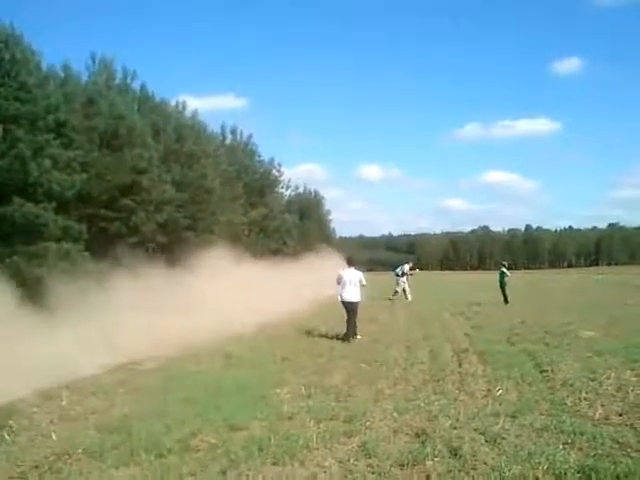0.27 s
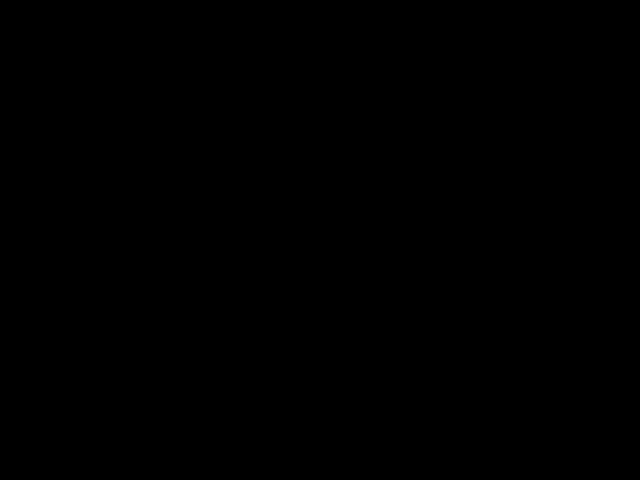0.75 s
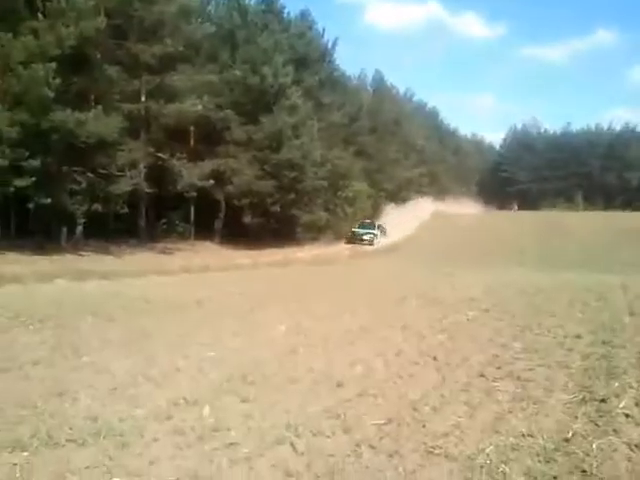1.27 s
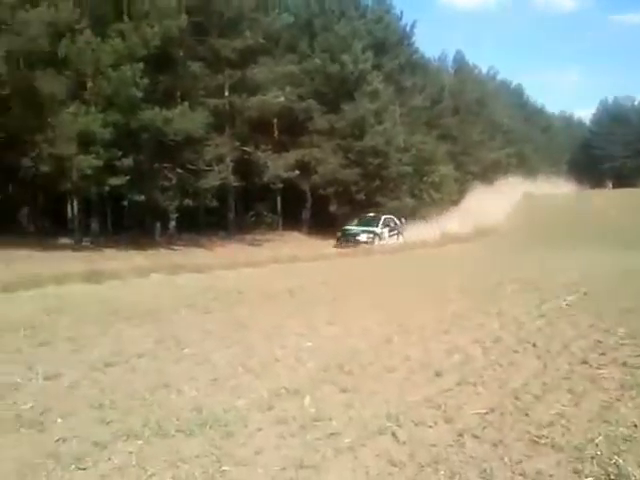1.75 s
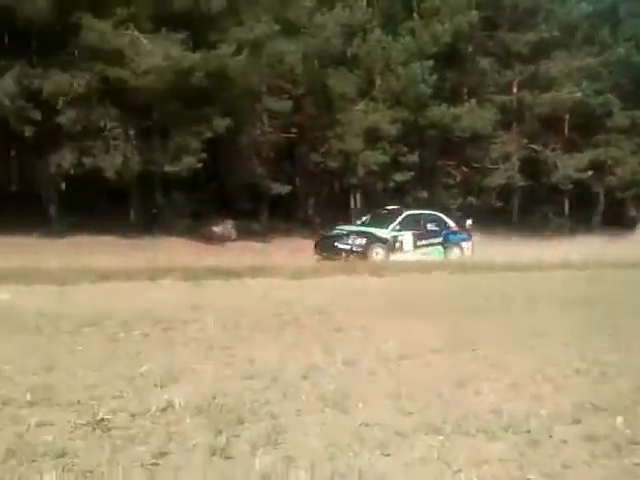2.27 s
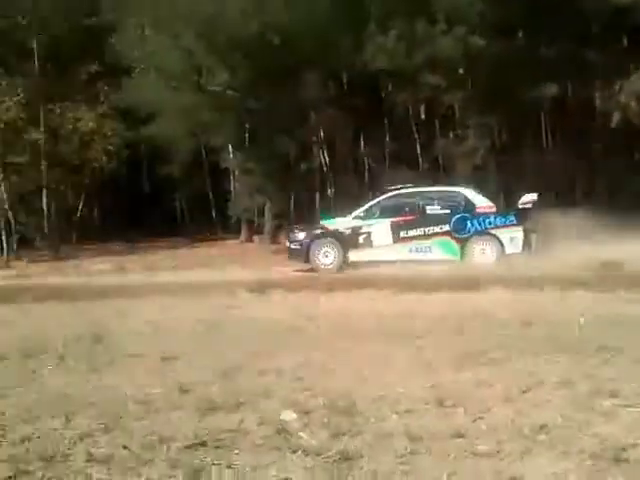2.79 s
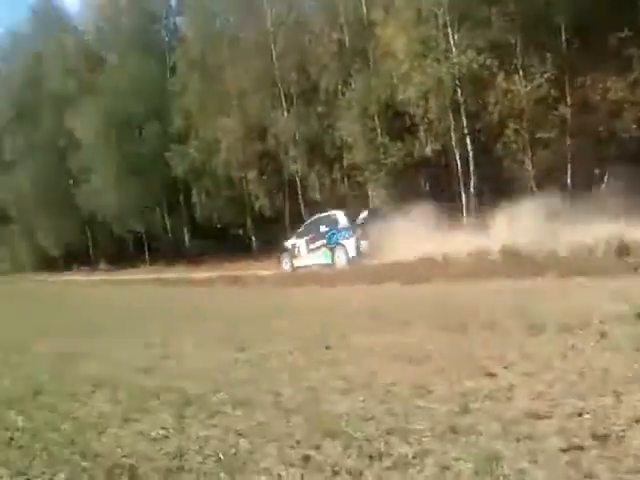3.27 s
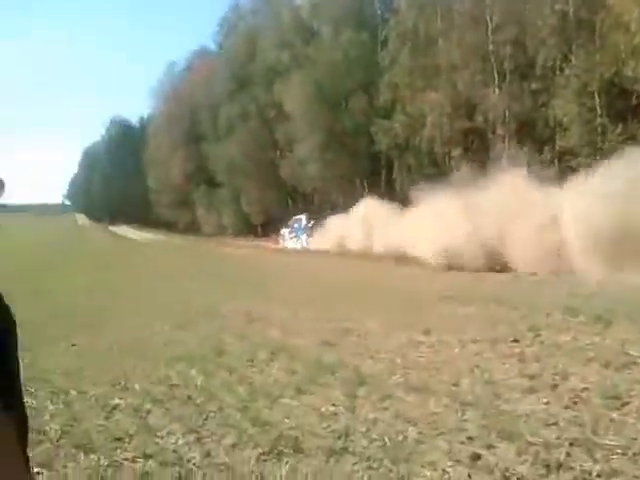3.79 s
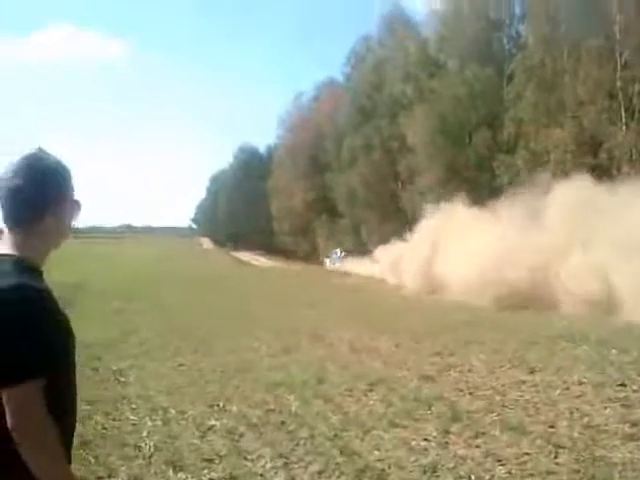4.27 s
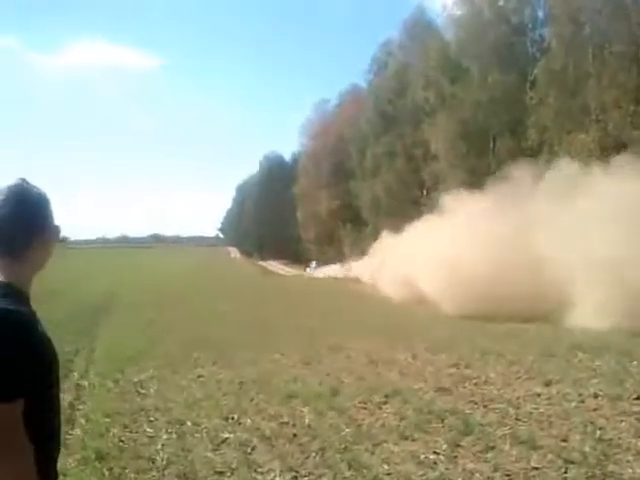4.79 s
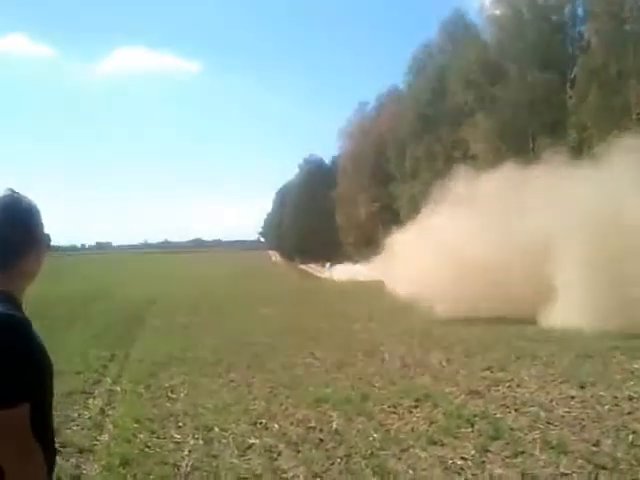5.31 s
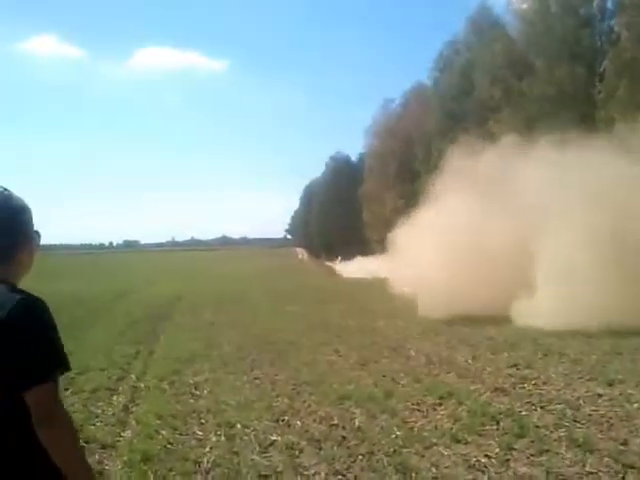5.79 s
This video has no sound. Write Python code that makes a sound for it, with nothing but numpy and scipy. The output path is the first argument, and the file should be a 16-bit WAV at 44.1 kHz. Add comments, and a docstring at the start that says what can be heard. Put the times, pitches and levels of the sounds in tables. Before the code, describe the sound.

A rally car backfires away on gravel; after a sudden silence, it burbles closer, bangs past and accelerates into the distance.

```python
"""A turbocharged rally car on gravel beside a forest, in two scenes with silence between.
First it leaves, lifts off and backfires; then it comes in burbling, passes and pulls away at full song.
The engine is a sum of locked orders; off the throttle, firings bang in the exhaust pipe.
Tyres grind gravel, stones tick on metal, the turbo hisses, and the trees echo bangs and stones."""
import sys
import numpy as np
from scipy import signal
from scipy.fft import rfft, irfft, next_fast_len
from scipy.io import wavfile
from scipy.ndimage import uniform_filter1d, map_coordinates

SR = 44100
rng = np.random.default_rng(int(sys.argv[2]) if len(sys.argv) > 2 else 0)


def wrap_up_sound(samples):
    """Save the sound to the file named by the first command line argument, as 16-bit audio."""
    columns = np.atleast_2d(samples).T
    # keep every value between -1 and 1, then stretch to whole-number steps
    tamed = np.clip(columns, -1, 1)
    steps = np.round(tamed * 32767).astype(np.int16)
    wavfile.write(sys.argv[1], SR, steps)


N = 266805
T = np.arange(N) / SR

# audible scenes: start/s, end/s
SCENES = [(0, .9695), (1.5855, 6.06)]
FIRST_SCENE = T < SCENES[0][1]


def amp(db):
    return 10 ** (np.asarray(db) / 20)


def unit_rms(x):
    return x / np.sqrt(np.mean(x ** 2) + 1e-20)


def along(points, hz):
    """Interpolate (f/Hz, value) points on a log axis."""
    f, values = np.transpose(points)
    return np.interp(np.log(hz + 1), np.log(f + 1), values)


def curves(rows):
    """Soft-edged mask of the rows' time span, and each further column per sample."""
    at_s, *columns = np.transpose(rows)
    on = np.clip(np.minimum(T - at_s[0], at_s[-1] - T) * 200 + 1, 0, 1)
    return on, [np.interp(T, at_s, column) for column in columns]


def wobble(rate_hz):
    """Smooth random curve with knots at rate_hz."""
    return map_coordinates(rng.standard_normal(int(N * rate_hz / SR) + 4), [T * rate_hz])


def filtered(x, response):
    """Apply the gain response(f/Hz)."""
    size = next_fast_len(N + 8192)
    return irfft(rfft(x, size) * response(np.fft.rfftfreq(size, 1 / SR)), size)[:N]


def coloured(x, spectrum):
    """Filter by (f/Hz, level/dB) points."""
    return filtered(x, lambda hz: amp(along(spectrum, hz)))


def rush(spectrum, patchy_db, gate=1):
    """Coloured noise, rms 1, with patches of random gain; gated before colouring."""
    bins = signal.stft(gate * rng.standard_normal(N), nperseg=512)[2]
    patches = uniform_filter1d(uniform_filter1d(rng.standard_normal(bins.shape), 5, 0), 9, 1)
    noise = signal.istft(bins * amp(patchy_db * unit_rms(patches)), nperseg=512)[1][:N]
    return unit_rms(coloured(noise, spectrum))


def spikes(at_s, size):
    """Impulses of given times and sizes."""
    return np.bincount(np.clip(np.round(at_s * SR).astype(int), 0, N - 1), size, N)


def struck(x, shape):
    return signal.fftconvolve(x, shape)[:N]


def forest(x):
    """Trees scatter sound back, each frequency dying at its own speed."""
    # echo decay: f/Hz, t60/s
    decay = [(100, 0.11), (800, 1), (3000, 0.9), (8000, .15)]
    hz, t, bins = signal.stft(rng.standard_normal(SR // 2), SR, nperseg=256)
    tail = signal.istft(bins * amp(-60 * t / along(decay, hz)[:, None]), SR, nperseg=256)[1]
    echo = struck(np.pad(x, (300, 0)), tail / np.linalg.norm(tail))
    return filtered(echo, lambda hz: hz / (hz + 600))  # trunks and leaves scatter little bass


def road(throb, engine_roar):
    """Rumble, roar throbbing with the firings, and tyre noise grained by small stones."""
    # tyres, per scene: t/s, gravel level/dB, grit spray re gravel/dB
    tyre_levels = [
        [(0.0, -31.5, -42), (0.27, -32.5, -52.5), (0.486, -25.5, -29), (0.608, -26.5, -41.5), (0.7, -35, -39),
         (0.72, -26, -21), (0.965, -36.5, -39.5)],
        [(1.59, -30, -11), (1.74, -29, -16), (1.81, -25, -15), (1.97, -27, -16), (2.14, -32.5, -22.5),
         (2.4, -37.5, -11.5), (2.54, -33, -12.5), (2.58, -26.5, -6), (2.7, -30.5, -12), (2.84, -25, -13.5),
         (3.07, -23.5, -4.5), (3.3, -26.5, -5.5), (3.43, -30.5, -11.5), (3.47, -24.5, -15.5),
         (3.66, -17.5, -13.5), (3.85, -22.5, -10.5), (4.0, -24, -12.5), (4.12, -29.5, -12), (4.3, -29.5, -13),
         (5.1, -38.5, -18), (5.5, -42, -12), (6.05, -42, -30)],
    ]
    # rumble, per scene: t/s, level/dB
    rumble_levels = [
        [(0.0, -18), (0.23, -41.5), (0.49, -26), (0.965, -26.5)],
        [(1.59, -43), (1.75, -23), (1.97, -19.5), (2.14, -24.5), (2.34, -18.5), (2.84, -16), (3.0, -20),
         (3.28, -15), (3.47, -11), (3.62, -19), (3.95, -23), (4.3, -30.5), (6.05, -39)],
    ]
    # noise spectra: f/Hz, level/dB
    rumble_spectrum = [(15, -22), (35, -4), (55, -1.5), (90, -1.5), (150, -4.5), (260, -13.5), (400, -33.5),
                       (700, -86.5), (3000, -110)]
    roar_spectrum = [(150, -16), (300, 1), (460, -2.5), (590, 2.5), (750, 1), (950, -6), (1300, -9),
                     (2000, -63.5), (6000, -110)]
    first_scene_gravel_spectrum = [(500, -13), (1000, 7), (1400, -0.5), (1900, 0.5), (2550, -14),
                                   (3500, -8.5), (4300, -17), (5200, -30), (7000, -63), (9000, -110)]
    second_scene_gravel_spectrum = [(500, -27), (900, 0), (1150, -4), (1450, -2.5), (1850, 1), (2050, -2),
                                    (2500, 0), (3300, -8.5), (4300, -10.5), (5300, -21.5), (7000, -59.5),
                                    (10000, -110)]
    spray_spectrum = [(3500, -36.5), (5200, -1.5), (6300, 3), (7400, -3), (8300, -15.5), (8900, -26),
                      (9600, -58), (11000, -110)]
    _, (gravel_db, spray_db) = curves(np.vstack(tyre_levels))
    _, (rumble_db,) = curves(np.vstack(rumble_levels))
    when, size = rng.random((9000, 2)).T
    grains = spikes(when * N / SR, amp(-3.5 * np.log(size + .004) - 22))
    grit = 1 + struck(grains, np.exp(-np.arange(130) / 30))
    flutter = .6 * wobble(14)
    first_gravel = rush(first_scene_gravel_spectrum, 2.1, grit)
    second_gravel = rush(second_scene_gravel_spectrum, 1.6, (0.49 + 0.42 * throb) * grit)
    gravel = amp(gravel_db + 1.8 * flutter) * np.where(FIRST_SCENE, first_gravel, second_gravel)
    rumble = amp(rumble_db + 0.89 * wobble(10)) * rush(rumble_spectrum, 1.1)
    roar_level = np.hypot(engine_roar, amp(gravel_db - 5)) * amp(1.1 * flutter)
    roar = roar_level * rush(roar_spectrum, 0.58, throb)
    spray = amp(gravel_db + spray_db + 0.7 * flutter) * rush(spray_spectrum, 3.1, grit)
    return rumble + roar + gravel + spray


def stones():
    """Flung stones tick on metal; one knocks something hollow, leaving a thin ring."""
    # ticks: t/s, level/dB
    hits = [(1.7155, -30.5), (3.463, -13), (3.487, -4.5), (3.5107, -24.5), (3.5565, -17), (3.678, -15),
            (3.794, -13), (5.463, -26), (5.464, -27), (5.4845, -24.5), (5.487, -32.5)]
    # hollow hit: t/s, knock level/dB, knock f/Hz, ring f/Hz, ring level/dB, ring t60/s
    hollow_hit = (1.7164, -12, 640, 474, -26, .7)
    tick_spectrum = [(700, -25.5), (2000, 6.5), (6000, -3.5), (9000, -14.5), (10000, 1.5),
                     (12000, -15), (15000, -25)]
    t = np.arange(SR // 2) / SR
    tick_s, tick_db = np.transpose(hits)
    envelope = struck(spikes(tick_s, amp(tick_db)), amp(4.5 - 60 * t / .01))
    ticks = coloured(envelope * rng.standard_normal(N), tick_spectrum)
    knock_s, knock_db, knock_hz, ring_hz, ring_db, ring_t60_s = hollow_hit
    knock = amp(knock_db - 60 * t / 0.022) * np.sin(2 * np.pi * knock_hz * t)
    ring = amp(ring_db - 60 * t / ring_t60_s) * np.sin(2 * np.pi * ring_hz * t)
    return ticks + struck(spikes(np.array([knock_s]), np.ones(1)), knock + ring)


def turbo():
    """Narrow-band noise riding on wheel speed: hiss off boost, rasp on spool-up."""
    # sweeps: t/s, length/s, start f/Hz, middle f/Hz, end f/Hz, level/dB, blur/Hz
    sweeps = [(1.603, .07, 6200, 6150, 6070, -44, 51), (1.86, 0.29, 7000, 6100, 6120, -54, 80.2),
              (3.52, .43, 1950, 2700, 2550, -24, 598.7), (3.5, .52, 3000, 3450, 3200, -29, 700)]
    swell_s = 0.033
    out = np.zeros(N)
    for start_s, length_s, *path_hz, db, blur_hz in sweeps:
        end_s = start_s + length_s
        on = np.clip(np.minimum(T - start_s, end_s - T) / swell_s + .5, 0, 1) ** 2
        hz = np.interp(T, [start_s, start_s + length_s / 2, end_s], path_hz)
        phase = 2 * np.pi * np.cumsum(hz) / SR
        out += on * amp(db) * (wobble(blur_hz) * np.sin(phase) + wobble(blur_hz) * np.cos(phase))
    return out


def burble():
    """Off the throttle every third firing bangs, the others are faint; returns t/s, level/dB."""
    # overrun: t/s, bang rate/Hz, level/dB, irregularity/0-1
    overrun = [(1.59, 57, -27, 0.28), (1.72, 56, -19.5, 0.08), (2.14, 50.7, -21, 0),
               (2.35, 49.8, -19.5, .05), (2.55, 48.9, -17.5, 0.11), (2.8, 47.6, -13.5, 0.09),
               (2.88, 46.7, -5.5, 0.03), (3.168, 43.4, 1.5, .01), (3.31, 41.9, -1.5, 0.02),
               (3.33, 42, -12.5, 0.25), (3.45, 50, -7.5, 0.08)]
    beat_s, slip_s = 3.168, 2.965  # a bang falls on the beat; the pattern slips by one firing
    on, (bang_hz, peak_db, rough) = curves(overrun)
    firings = np.cumsum(3 * bang_hz) / SR
    firings -= firings[round(beat_s * SR)]
    at = np.flatnonzero((np.diff(np.floor(firings)) > 0) & (on[1:] > 0))
    level_jitter, time_jitter, weak_jitter = rng.standard_normal((len(at), 3)).T
    strong = (np.floor(firings[at + 1]) + (at < slip_s * SR)) % 3 == 0
    weak_db = np.where(strong, 0, -14 + 30 * rough[at] + 3.5 * weak_jitter)
    db = peak_db[at] + weak_db + (1.2 + 8 * rough[at]) * level_jitter
    at_s = at / SR + (rough[at] + 0.13 * ~strong) * time_jitter / bang_hz[at]
    return at_s, db


def exhaust():
    """Each bang sucks and pushes in the pipe, with a crack of noise on its front."""
    # single backfires: t/s, pulse level/dB, crack level/dB
    backfires = [(0.3088, -8, -30), (0.3166, -2.5, -18), (0.4117, -2.5, -30), (0.418, -13.5, -28.5),
                 (0.4449, -4.5, -17.5), (0.473, -3.5, -15), (0.4986, -2, -17.5), (0.506, -9.5, -16.5),
                 (0.524, -6, -35.5), (0.5506, -11, -25), (0.629, -4.5, -34.5), (0.6373, -4.5, -41.5),
                 (0.6558, -7, -29.5), (0.7144, 3, -22.5), (.72, -6, -39), (0.7413, -5, -23.5),
                 (0.7699, -7, -30.5), (0.7993, -7.5, -28.5), (0.8308, -6.5, -26.5), (0.9009, -12, -34.5),
                 (2.313, -17, -41.5), (2.528, -12.5, -35), (2.5482, -9, -23), (2.9706, -7.5, -29),
                 (3.462, -7, -20), (3.4768, 5.5, -26)]
    crack_spectrum = [(200, -0.5), (500, 4), (1050, 6.5), (1450, -5.5), (1900, 3.0), (2600, -5.5),
                      (3400, -0.5), (5000, -13), (8000, -40), (11000, -78.5)]
    burble_s, burble_db = burble()
    backfire_s, backfire_db, crack_db = np.transpose(backfires)
    t = np.arange(SR // 20) / SR
    pulse = -np.sin(2 * np.pi * (t / .006) ** .68) * np.exp(-.5 * ((t - .0026) / .0026) ** 2)
    pulse = np.convolve(pulse, np.hanning(14))[:len(t)]  # the long pipe rounds the front
    pulse += amp(-18) * np.roll(pulse, round(.0082 * SR))  # a weaker wave returns along the pipe
    blows = spikes(burble_s, amp(burble_db)) + spikes(backfire_s, amp(backfire_db))
    rise = 1 - np.exp(-(t / .0015) ** 2)
    backfire_cracks = spikes(backfire_s, amp(crack_db))
    all_cracks = spikes(burble_s, amp(burble_db - 15)) + backfire_cracks
    crack_envelope = struck(all_cracks, amp(11 - 60 * t / .02) * rise)
    hiss_envelope = struck(backfire_cracks, amp(5 - 60 * t / .09) * rise)
    noise = coloured((crack_envelope + hiss_envelope) * rng.standard_normal(N), crack_spectrum)
    return struck(blows, pulse / np.abs(pulse).max()) + noise


def engine():
    """Locked orders form a steep-fronted wave; returns tone, per-firing throb, roar level."""
    # on throttle, per pull: t/s, firing rate/Hz, 1st-order level/dB
    pulls = [
        [(0.0, 125.2, -16), (0.296, 119.7, -15)],
        [(0.326, 119.5, -16.5), (0.398, 114, -14.5)],
        [(0.556, 122, -12.5), (0.618, 112.8, -21.5)],
        [(3.48, 130.2, -12.5), (3.58, 133.1, -8), (3.7, 135.6, -9), (3.87, 136.2, -7.5), (4.05, 129.7, -8),
         (4.23, 131.6, -9.5), (4.79, 135.5, -12), (5.6, 143.1, -17), (6.05, 145.2, -18)],
    ]
    # upper orders: order, level re 1st/dB, extra loss with distance/(dB/dB), first-scene offset/dB
    upper_orders = [(2, -7, .5, 0.5), (3, -16.5, 0.3, -6.5)]
    # weaker orders: order, level re 1st/dB
    weak_orders = [(.5, -32.5), (1.5, -20), (2.5, -23.5), (3.5, -36), (4, -21.5), (4.5, -26.5), (5, -22),
                   (5.5, -29.5), (6, -26.5), (7, -27.5)]
    full_db, bite_s = -7, 0.17
    tone, throb, roar = np.zeros(N), np.ones(N), np.zeros(N)
    for pull in pulls:
        on, (firing_hz, first_db) = curves(pull)
        phase = 2 * np.pi * np.cumsum(firing_hz * (1 + .011 * wobble(71))) / SR
        open_s = pull[0][0]
        # upper orders stand out just after the throttle opens
        bite_db = 5.5 * (open_s > 0) * np.exp(-((T - open_s) / bite_s) ** 2)
        distance_db = first_db - full_db
        orders = [(1, first_db)]
        for k, db, loss, offset_db in upper_orders:
            orders.append((k, first_db + db + loss * distance_db + bite_db + offset_db * FIRST_SCENE))
        for k, db in weak_orders:
            orders.append((k, first_db + db + 0.19 * k * distance_db + 3.06 * wobble(18)))
        strength = amp(3.5 + 0.66 * wobble(80))  # no two firings are alike
        tone -= on * strength * sum(amp(db) * np.cos(k * phase + .75) for k, db in orders)
        throb += on * 0.4 * np.cos(phase - .8)
        roar += on * amp(-22 + 1.64 * distance_db)
    return tone, throb, roar


def scene():
    """Mono mix; only bangs and stones echo."""
    tone, throb, roar = engine()
    impacts = exhaust() + stones()
    return (tone + impacts + amp(-8.5) * forest(impacts) + road(throb, roar) + throb * turbo())[None]


def record(dry):
    """Peaks flatten, the top end dulls, both scenes start and stop hard."""
    # treble roll-off: f/Hz, level/dB
    roll_off = [(8700, 0), (9800, -14.5)]
    ceiling, top_hz = 1.01, 15500
    x = dry[0] / (1 + np.abs(dry[0] / ceiling) ** 6) ** (1 / 6)
    x = filtered(x, lambda hz: amp(along(roll_off, hz)) * (hz < top_hz))
    audible = sum((T >= start_s) & (T < end_s) for start_s, end_s in SCENES)
    return (x * audible)[None]


dry = scene()
out = record(dry)
wrap_up_sound(out)
```